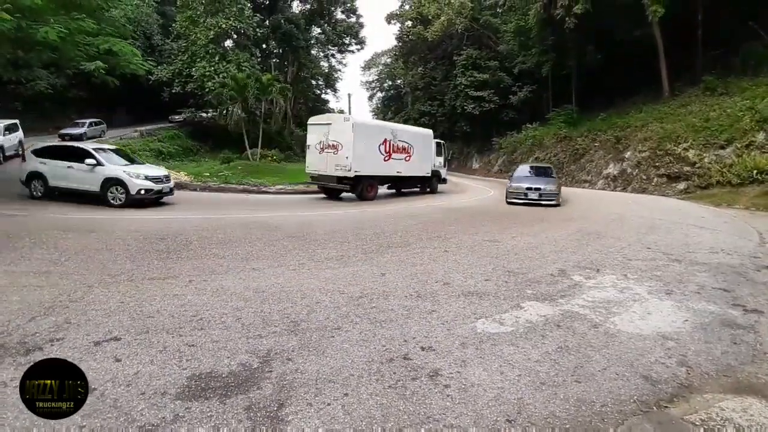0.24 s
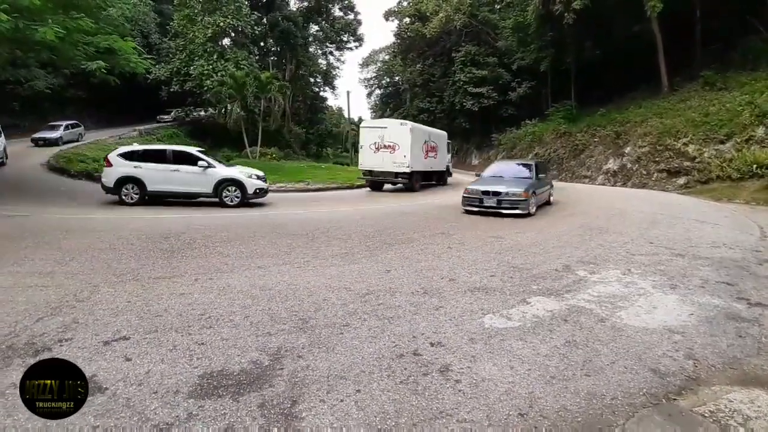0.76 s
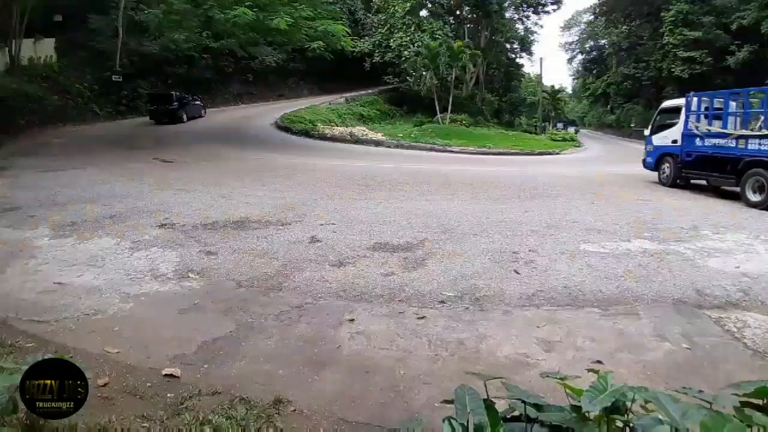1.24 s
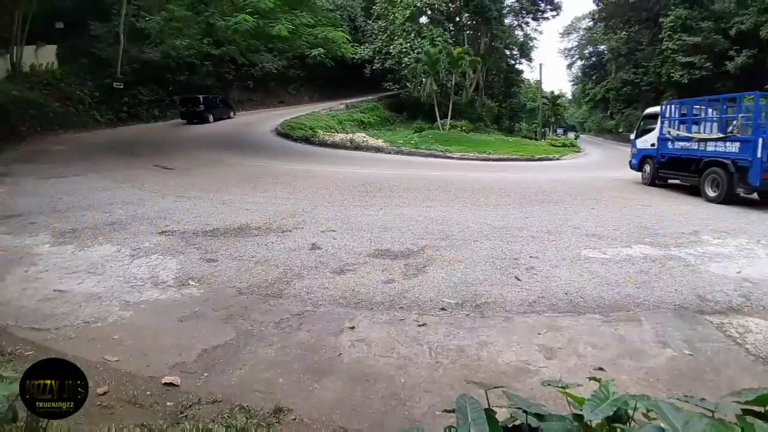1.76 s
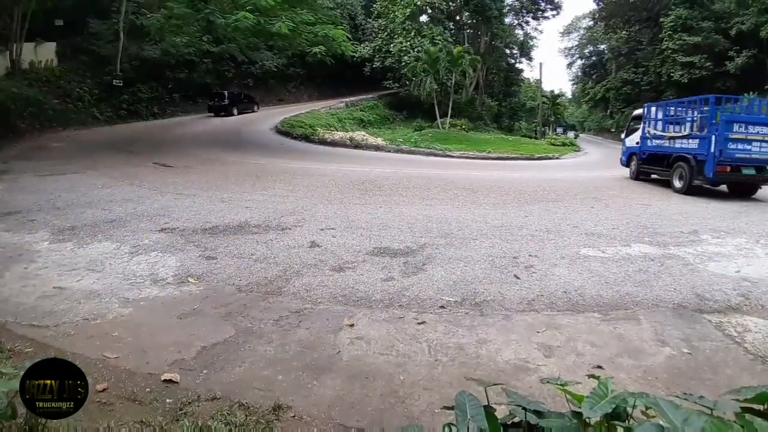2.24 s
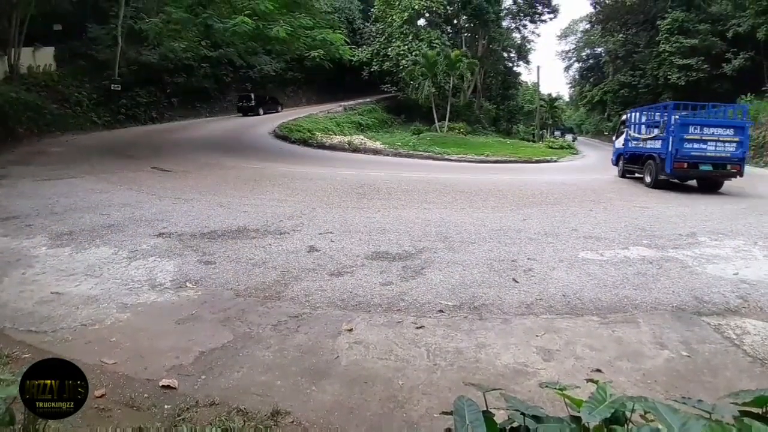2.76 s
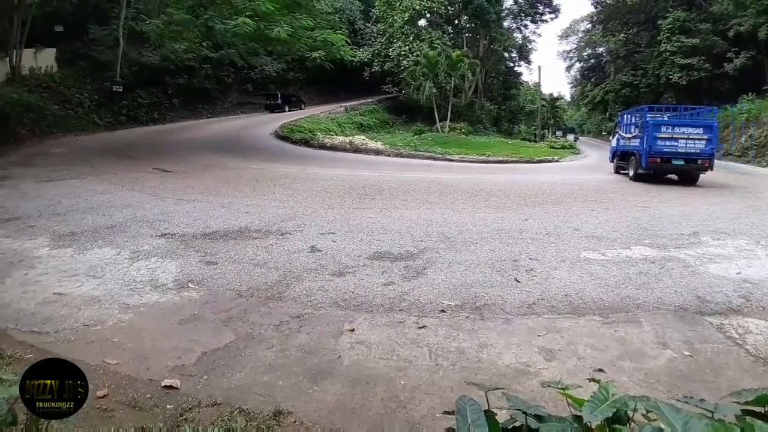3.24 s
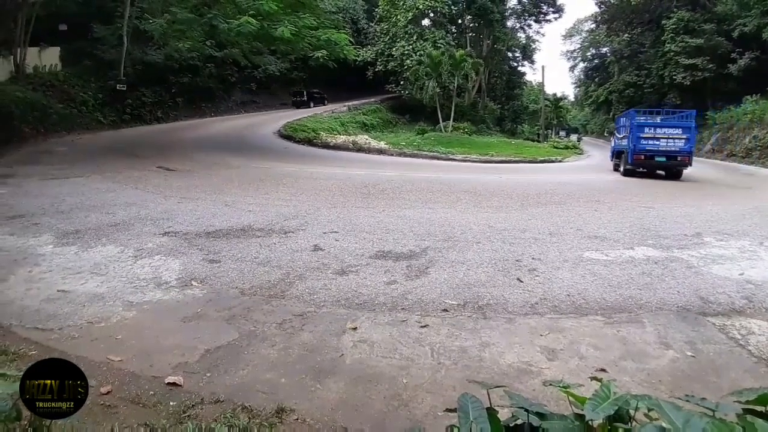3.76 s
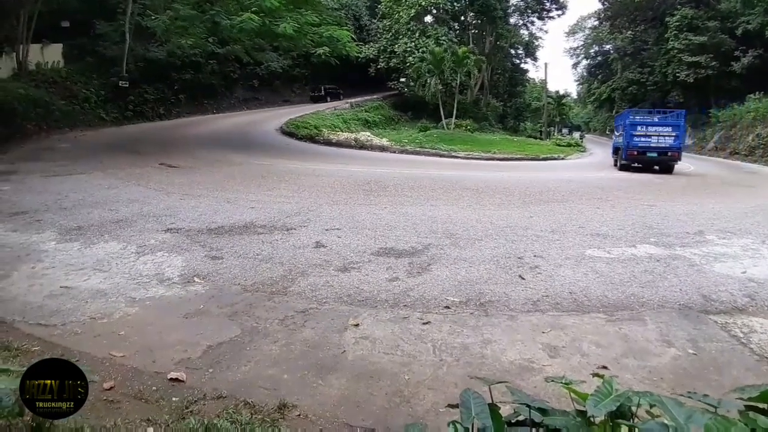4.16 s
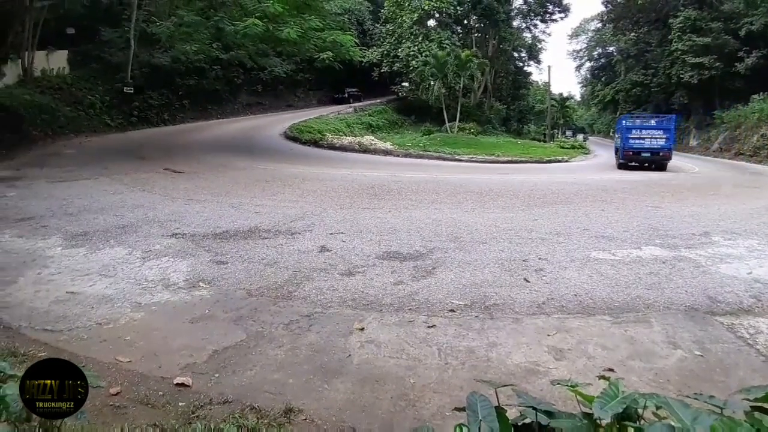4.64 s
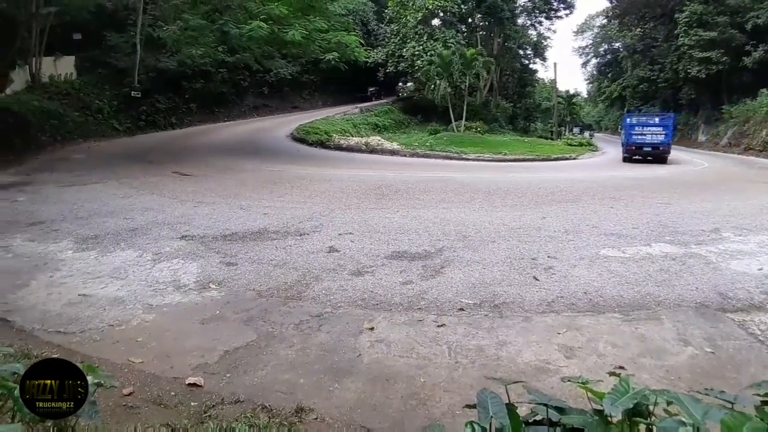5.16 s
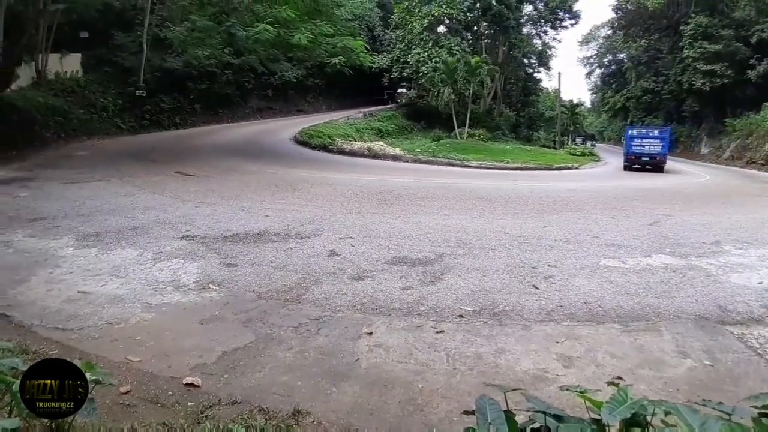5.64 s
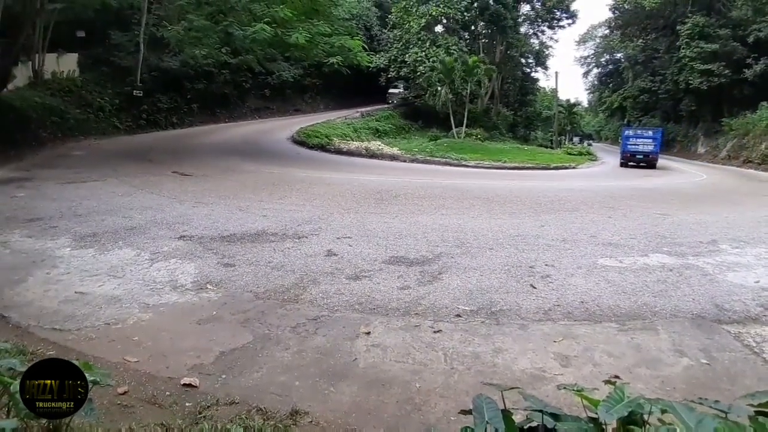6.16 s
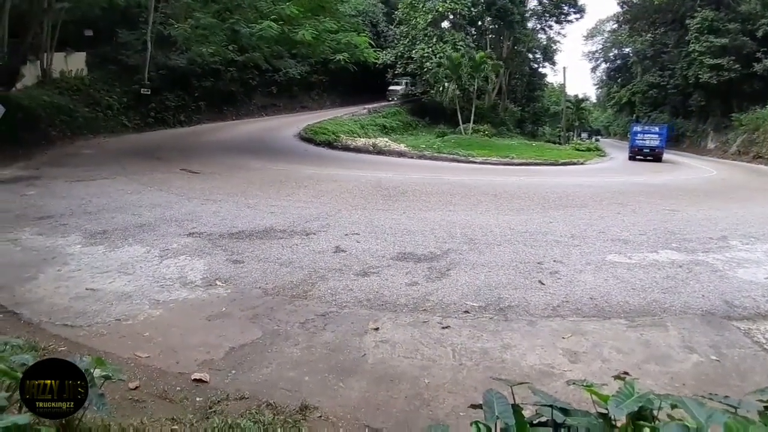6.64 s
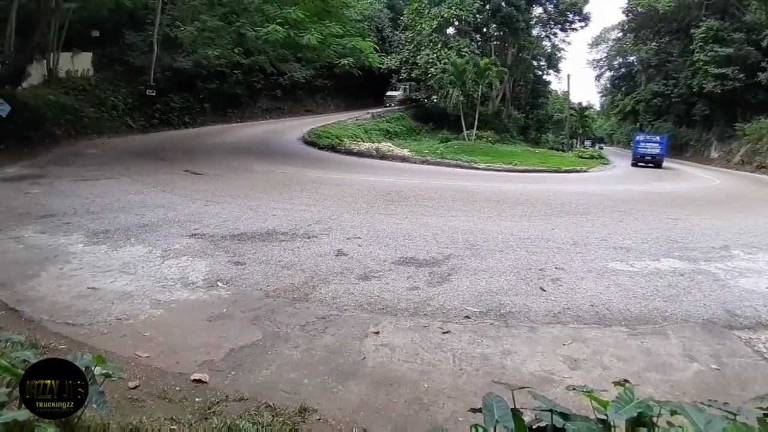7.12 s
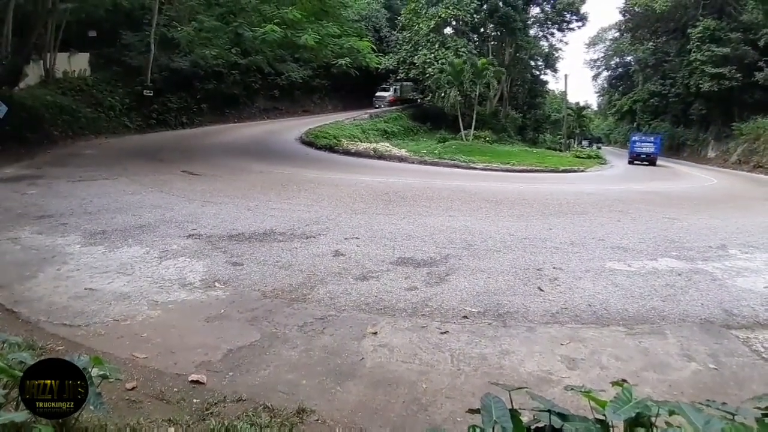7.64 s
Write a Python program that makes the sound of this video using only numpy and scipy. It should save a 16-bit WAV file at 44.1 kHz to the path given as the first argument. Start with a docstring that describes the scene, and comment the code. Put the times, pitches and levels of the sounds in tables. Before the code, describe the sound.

On a wooded hairpin bend, a box truck's engine and tyre noise fade to silence. Abruptly two trucks are close: a heavy diesel growls as it slowly loses revs, while a lighter truck revs and booms off the throttle. Brakes squeak faintly and loose metal rattles over tyre hiss. A horn gives two loud, short toots that echo off the hillside, and the engines carry on farther away.

```python
"""A box truck's engine and road noise, on a steep hairpin bend among trees, are faded out to silence.
The scene changes abruptly: a heavy diesel truck holds back on its engine, slowly losing revs, while a
light truck revs, booms on the overrun and changes gear. Their periodic firing makes exhaust tones,
rumble and clatter over the hiss of tyres on asphalt. Brakes squeak faintly, loose metal rattles, and
the two buzzing diaphragms of a horn toot twice, echoed by the hillside."""
import sys
import numpy as np
from scipy import signal
from scipy.fft import rfft, irfft, next_fast_len
from scipy.io import wavfile

SR = 44100
rng = np.random.default_rng(int(sys.argv[2]) if len(sys.argv) > 2 else 0)


def master_out(mix):
    """Clip the mix to full scale and print it as 16-bit PCM to the path in sys.argv[1]."""
    frames = np.transpose(np.atleast_2d(mix))
    ceiling = np.clip(frames, -1, 1)
    pcm = np.round(ceiling * 32767).astype(np.int16)
    wavfile.write(sys.argv[1], SR, pcm)


N = 347949
TIME = np.arange(N) / SR
FFT_SIZE = next_fast_len(N + SR)
FREQ_HZ = np.maximum(np.arange(FFT_SIZE // 2 + 1) * SR / FFT_SIZE, 1)

SCENE_CHANGE_S = 1.234
TURN_S, TURN_LENGTH_S = 4.86, 0.83   # the two trucks turn away, from near to far
PIPE_HZ, PIPE_WIDTH_HZ, PIPE_DB = 108, 12.5, 5.5   # resonance of the light truck's exhaust pipe

# the light truck's overrun, throttle shut: start_s, end_s, gain_db
OVERRUN = (2.62, 3.37, 10.5)
# relative beat of each cylinder of a four-cylinder engine: level_db
FOUR_CYLINDERS_DB = [-3.5, -7, -3, -9]


def from_db(db):
    """Amplitude ratio of a level in decibels."""
    return 10 ** (np.asarray(db) / 20)


def unit_rms(x):
    """Normalisation to unit power."""
    return x / np.sqrt(np.mean(x ** 2) + 1e-20)


def spectral_curve(points):
    """Interpolation of (frequency_hz, value) points along a logarithmic frequency axis."""
    hz, value = np.transpose(points)
    return np.interp(np.log(FREQ_HZ), np.log(hz), value)


def filtered(x, response):
    """Linear filtering: the spectrum is multiplied by a frequency response."""
    return irfft(rfft(x, FFT_SIZE) * response, FFT_SIZE)[..., :N]


def coloured(x, spectrum):
    """Spectral shaping to unit power, with steep skirts beyond the ends of the spectrum."""
    skirts = (1 + (spectrum[0][0] / FREQ_HZ) ** 12 + (FREQ_HZ / spectrum[-1][0]) ** 12) ** -.5
    return unit_rms(filtered(x, from_db(spectral_curve(spectrum)) * skirts))


def drift(rate_hz, size=N):
    """Random modulation: low-passed noise of unit power."""
    step = 40   # samples between random values
    pole = np.exp(-2 * np.pi * step * rate_hz / SR)
    slow = signal.lfilter([1], [1, -2 * pole, pole * pole], rng.standard_normal(N // step + 2002))[2000:]
    return np.interp(np.arange(size) / step, np.arange(len(slow)), unit_rms(slow))


def cycles(hz):
    """Phase in cycles is the time integral of frequency."""
    return np.cumsum(hz) / SR


def placed(x, lead_ms, left_db):
    """Interaural time and level differences: the left ear leads by lead_ms and differs by left_db."""
    left, right = np.broadcast_to(x, (2, N))
    gain = from_db(left_db / 2)
    return np.array([left * gain, np.interp(TIME - lead_ms / 1000, TIME, right) / gain])


def stereo_noise():
    """A diffuse field: white noise, coherent between the ears only at long wavelengths."""
    # interaural coherence: frequency_hz, correlation
    coherence = [(50, 0.98), (250, 0.99), (500, 0.87), (1000, 0.1), (2000, 0.091), (4000, 0.23),
                 (8000, 0.057), (15000, 0.089)]
    alike = np.clip(spectral_curve(coherence), 0, 1)
    mid, side = filtered(rng.standard_normal((2, N)), np.sqrt([1 + alike, 1 - alike]))
    return unit_rms(np.array([mid + side, mid - side]))


def hillside(x, t60_s, dull_hz):
    """Scattering from the bank and trees gives each ear its own exponentially decaying echoes."""
    t = TIME[:SR]
    tail = rng.standard_normal((2, SR)) * from_db(-60 * t / t60_s) * (1 - np.exp(-t / 0.027))
    tail /= np.sqrt(np.sum(tail ** 2) / 2)
    tail = signal.sosfilt(signal.butter(1, dull_hz, fs=SR, output="sos"), tail)
    return signal.fftconvolve(x[None], tail, axes=1)[:, :N]


def brakes():
    """Friction-excited vibration: the linings give short squeaks of unsteady pitch."""
    # squeaks: peak_s, pitch_hz, half_width_s, level_db
    squeaks = [(0.968, 9300, 0.045, -70), (1.89, 9160, .04, -59), (2.84, 8750, .03, -61),
               (2.967, 8780, 0.029, -55), (2.95, 11200, .02, -55), (4.45, 8816, .04, -61)]
    sound = np.zeros(N)
    for peak_s, pitch_hz, half_width_s, db in squeaks:
        swell = from_db(db) * np.exp(-((TIME - peak_s) / half_width_s) ** 2)
        sound += swell * np.sin(2 * np.pi * cycles(pitch_hz * (1 + .014 * drift(200))))
    return placed(sound, lead_ms=0.314, left_db=8.0)


def rattles():
    """Impact noise: loose metal on the light truck chatters over bumps in broadband bursts."""
    # bumps: peak_s, half_width_s, level_db
    bumps = [(2.963, 0.029, -45), (4.43, 0.072, -50.5)]
    # spectrum of the metal: frequency_hz, gain_db
    metal = [(1300, 0), (3500, -2), (9000, -6), (14000, -10)]
    swell = sum(from_db(db) * np.exp(-((TIME - peak_s) / width) ** 2) for peak_s, width, db in bumps)
    return swell * coloured(stereo_noise() * from_db(3 * drift(80)), metal)


def drone(firing_hz, orders, waver_db, rough_db):
    """Engine orders (multiple, level_db) are tones locked to the firing; uneven firing roughens them."""
    phase = 2 * np.pi * cycles(firing_hz)
    tones = 0
    for multiple, db in orders:
        amplitude = np.sqrt(2) * from_db(db + waver_db * drift(9.0))
        tones += amplitude * np.sin(multiple * phase + rng.uniform(0, 2 * np.pi))
    return tones * from_db(rough_db * drift(30))


def exhaust_beats(firing_hz, cylinders_db, rough_db):
    """An impulse train, one puff per firing, varying from cylinder to cylinder and at random."""
    firings = np.flatnonzero(np.diff(np.floor(cycles(firing_hz))))
    scatter_db = rough_db * rng.standard_normal(N)[:len(firings)]
    beats = np.zeros(N)
    beats[firings] = from_db(np.resize(cylinders_db, len(firings)) + scatter_db)
    return unit_rms(beats)


def knock(firing_hz, decay_cycles):
    """The envelope of combustion noise: it flares at each firing and decays exponentially."""
    return unit_rms(np.exp(-(cycles(firing_hz) % 1) / decay_cycles) * from_db(2.9 * drift(36)))


def traffic(spectra, levels_db, beats, knocks, beat_db, shake_db, knock_share, lead_ms, left_db):
    """Source and filter: noise and firing pulses are shaped into rumble, clatter and tyre hiss."""
    rumble_db, clatter_db, hiss_db = levels_db
    air = stereo_noise()
    pulsing = air * (1 - knock_share + knock_share * knocks)
    # firings shake block and body, smeared by nearby echoes
    shake = unit_rms(hillside(beats, t60_s=0.038, dull_hz=1500))[0]
    rumble = from_db(rumble_db) * coloured(air + from_db(beat_db) * beats, spectra[0])
    clatter = from_db(clatter_db) * coloured(pulsing + from_db(shake_db) * shake, spectra[1])
    hiss = from_db(hiss_db) * coloured(pulsing, spectra[2])
    return placed(rumble, 0.38 * lead_ms, 0.5 * left_db) + placed(clatter + hiss, lead_ms, left_db)


def box_truck():
    """Periodic firing: engine orders and road noise, revs creeping up, are faded out to silence."""
    # spectra of exhaust, engine and tyres: frequency_hz, gain_db
    rumble = [(21, -42), (35, -31), (64, -20), (85, -5), (123, -10.5), (226, -5), (258, -11), (339, -10.5),
              (600, -21), (780, -42), (1320, -120)]
    clatter = [(260, -41), (450, -27), (502, -30), (737, -2), (970, -4), (1110, -2), (1350, -3.5),
               (2680, -17.5), (3360, -30), (4000, -27), (5200, -58), (8800, -120)]
    hiss = [(1880, -11), (3200, -4.5), (3490, -7.5), (4450, -11), (4820, -9), (6060, -12.5), (10700, -14.5),
            (16000, -19)]
    # rumble, clatter and hiss before the fade: start_db, slope_db_per_s
    trends = [(-32, -2.5), (-41.5, 1.5), (-50, -2)]
    # exhaust tones before the fade: firing_multiple, level_db
    orders = [(1, -41), (2, -38), (3, -46), (4, -42.5)]
    firing_hz = 56.56 + 2.5 * TIME
    levels_db = [db + slope * TIME for db, slope in trends]
    tones = drone(firing_hz, orders, waver_db=2.4, rough_db=1.8)
    beats = exhaust_beats(firing_hz, FOUR_CYLINDERS_DB, rough_db=5.0)
    road = traffic((rumble, clatter, hiss), levels_db, beats, knock(firing_hz, decay_cycles=.4),
                   beat_db=-7, shake_db=-27, knock_share=0.19, lead_ms=.6, left_db=6.4)
    silent_s = 1.196
    return (tones + road) * np.clip(1 - TIME / silent_s, 0, 1) ** 1.03


def heavy_exhaust(firing_hz, away):
    """Six unequal cylinders add lines between the firing harmonics, which beat together as a growl."""
    # harmonics of the six-firing cycle: cycle_multiple, start_db, near_slope_db_per_s, far_db
    lines = [(6, -37.5, .3, -51), (14, -39.5, -3.5, -52), (18, -39, -4, -44.5), (20, -45, 1, -64),
             (21, -42, 2.6, -56.5), (22, -43, 1.4, -55), (24, -36, -7, -48), (27, -46, -0.5, -59)]
    near_s = np.clip(TIME, SCENE_CHANGE_S, TURN_S) - SCENE_CHANGE_S
    orders = [(k / 6, (1 - away) * (db + slope * near_s) + away * far_db)
              for k, db, slope, far_db in lines]
    return drone(firing_hz, orders, waver_db=1.5, rough_db=.5)


def pedal(start_s, end_s, gain_db):
    """A trapezoidal level change: the pedal moves, holds and returns."""
    travel_s = .14
    return gain_db * np.clip(np.minimum(TIME - start_s, end_s - TIME) / travel_s + .5, 0, 1)


def light_exhaust(firing_hz, away):
    """Pipe resonance lifts the firing tone; it also booms on the overrun and drops with the clutch."""
    # gear change, clutch out: start_s, end_s, gain_db
    gear_change = (5.2, 5.52, -27)
    # overtones relative to the firing tone: firing_multiple, near_db, far_db
    overtones = [(2, -12, -3), (3, -16.5, -2)]
    boom_db = PIPE_DB * np.exp(-((firing_hz - PIPE_HZ) / PIPE_WIDTH_HZ) ** 2 / 2)
    pull_db = 1.5 * np.maximum(TIME - gear_change[1], 0)   # it pulls ever harder in the new gear
    tone_db = (1 - away) * (-45 + boom_db) + away * (-44.5 + pull_db)
    tone_db += pedal(*OVERRUN) + pedal(*gear_change)
    orders = [(k, tone_db + (1 - away) * near_db + away * far_db) for k, near_db, far_db in overtones]
    return drone(firing_hz, [(1, tone_db)] + orders, waver_db=2.0, rough_db=1.0)


def overrun_rasp(firing_hz):
    """Pulsed flow noise: with the throttle shut, each firing spits a burst through the pipe."""
    # pass band of the pipe: frequency_hz, gain_db
    band = [(1250, -6), (1380, 0), (1520, -8)]
    throttle_shut = pedal(*OVERRUN) / OVERRUN[2]
    level_db = -47.5 + 14 * np.log2(firing_hz / PIPE_HZ)   # louder at higher revs
    bursts = rng.standard_normal(N) * knock(firing_hz, decay_cycles=0.37)
    return throttle_shut * from_db(level_db) * coloured(bursts, band)


def two_trucks():
    """Superposition of two engines; their noise passes from near to far in a sine-cosine crossfade."""
    # revs of each truck: time_s, firing_hz
    heavy_revs = [(1.27, 65.06), (2.6, 61.51), (4.45, 57.55), (5.0, 56.38), (5.6, 53.76), (6.8, 51.67),
                  (7.89, 48.86)]
    light_revs = [(1.27, 87.5), (1.5, 96.6), (2.05, 105), (2.55, 127.4), (2.95, 113.2), (3.45, 87.5),
                  (4.0, 81.1), (4.25, 106.9), (4.8, 110.7), (5.08, 121), (5.5, 62), (6.7, 72.12),
                  (7.89, 81.5)]
    # relative beat of each of the heavy truck's cylinders: level_db
    six_cylinders_db = [-4.5, -10.5, -4, -8.5, -4, -9.5]
    # the heavy truck's gear tones, relative to the near clatter: firing_multiple, level_db
    gears = [(8, -17), (12, -15.5), (13, -13.5), (14, -23)]
    # spectra of exhausts, engines and tyres, near and far: frequency_hz, gain_db
    rumble_near = [(30, -23), (42, -8), (52, -4), (70, 2), (100, -2.5), (150, 3.5), (175, -5.5),
                   (220, -4.5), (280, 6), (330, -6), (450, -11.5), (650, -10.5)]
    clatter_near = [(260, -17), (450, -5), (484, -3), (566, -11), (731, 1.5), (869, 4.5), (927, 4),
                    (1110, -8), (1310, -1.5), (1490, -2.5), (1760, -7.5), (2030, -3.5), (2560, -8),
                    (3100, -16.5), (4000, -17.5), (5200, -28), (8800, -120)]
    hiss_near = [(1880, -14), (3200, -5.5), (4890, -8.5), (5860, -3), (7880, -10.5), (9020, -10),
                 (10200, -14), (13100, -13.5), (15100, -16), (16000, -21)]
    rumble_far = [(30, -26), (42, -8), (52, 7), (75, 1.5), (105, -2), (150, -2.5), (180, -1), (225, -1),
                  (290, 2.5), (350, -3.5), (450, -6), (650, -13)]
    clatter_far = [(260, -42), (450, -16.5), (516, -43), (560, -42), (597, -27), (717, 1), (815, -2.5),
                   (927, 2), (1150, -3), (1290, -10.5), (1400, -6), (1890, -10), (2090, -5), (2990, -15),
                   (4000, -16), (5200, -23.5), (8800, -120)]
    hiss_far = [(1880, -18), (3200, -17.5), (3490, -31.5), (3860, -26), (4890, -8), (5750, 6), (6840, 4),
                (7880, -2), (15100, -8), (16000, -28)]
    # near rumble, clatter and hiss: base_db, slope_db_per_s, light_revs_db_per_octave
    near_trends = [(-29, -1.28, 2.5), (-34, -0.62, 2), (-46.5, -1, 3)]
    # far rumble, clatter and hiss: level_db
    far_levels = [-36.5, -40.5, -54.5]
    heavy_hz = np.interp(TIME, *np.transpose(heavy_revs))
    light_hz = np.interp(TIME, *np.transpose(light_revs))
    away = np.clip((TIME - TURN_S) / TURN_LENGTH_S, 0, 1)
    near_db = [db + slope * (TIME - SCENE_CHANGE_S) + per_octave * np.log2(light_hz / PIPE_HZ)
               for db, slope, per_octave in near_trends]
    far_db = [db + 9.5 * np.maximum(TIME - 7.43, 0) for db in far_levels]   # more traffic draws near
    exhausts = heavy_exhaust(heavy_hz, away) + light_exhaust(light_hz, away)
    whine = drone(heavy_hz, [(k, near_db[1] + db) for k, db in gears], waver_db=0.0, rough_db=2.5)
    beats = exhaust_beats(heavy_hz, six_cylinders_db, rough_db=2.0)
    beats += 0.68 * exhaust_beats(light_hz, FOUR_CYLINDERS_DB, rough_db=2.0)
    knocks = (knock(heavy_hz, decay_cycles=1.0) + knock(light_hz, decay_cycles=1.0)) / 2
    near = traffic((rumble_near, clatter_near, hiss_near), near_db, beats, knocks,
                   beat_db=-3.0, shake_db=-26.5, knock_share=0.33, lead_ms=0.388, left_db=-2.5)
    near += placed(whine, lead_ms=0.19, left_db=-1.0)
    far = traffic((rumble_far, clatter_far, hiss_far), far_db, beats, knocks,
                  beat_db=-6.5, shake_db=-26.0, knock_share=0.17, lead_ms=0.3832, left_db=-3.0)
    road = np.cos(np.pi / 2 * away) * near + np.sin(np.pi / 2 * away) * far
    rasp = placed(overrun_rasp(light_hz), lead_ms=0.4, left_db=-4.0)
    return placed(exhausts, lead_ms=0.23, left_db=-1.1) + rasp + road


def diaphragm(harmonics, pitch_hz, dispersion_rad, buzz_db, top_db, count):
    """Self-sustained oscillation: a horn starts sharp, settles and rings on briefly after each press."""
    # presses of the button: start_s, end_s, level_db, tilt_db_per_octave
    toots = [(5.053, 5.136, -13, 0.43), (5.202, 5.279, -15, 1.06)]
    # spectrum of the contact's rasp: frequency_hz, gain_db
    contact = [(700, -3), (1200, 3), (2300, -3), (3300, -5), (4600, -16), (6500, -14), (7500, -11),
               (8300, -13), (12000, -10.5), (15000, -13)]
    sounding = (TIME > toots[0][0]) & (TIME < toots[-1][1] + .25)
    t = TIME[sounding]
    swings, sharp = [], 0
    for start_s, end_s, _, _ in toots:
        held_s, released_s = np.maximum(t - start_s, 0), np.maximum(t - end_s, 0)
        attack, release = 1 - np.exp(-held_s / 0.0094), np.exp(-released_s / 0.037)
        swings.append(attack * release * from_db(-18 * held_s))   # the swing sags while held
        sharp += 0.014 * np.exp(-held_s / 0.0176) * (t > start_s)
    strokes = cycles(pitch_hz * (1 + sharp + 0.0032 * drift(90, len(t))))
    # above the horn's resonances the contact leaves a low, even comb of harmonics
    partials_db = [db for _, db in harmonics] + [top_db] * (count - len(harmonics))
    total_rms = np.sqrt(np.sum(from_db(partials_db) ** 2) / 2)
    tone, rasp = np.zeros((2, 2, N))
    for k, db in enumerate(partials_db, 1):
        octaves = np.log2(k)
        # upper partials need a wide swing: they arrive later and die sooner
        swell = sum(swing ** (1 + 0.058 * octaves) * from_db(level_db + tilt * octaves)
                    for swing, (_, _, level_db, tilt) in zip(swings, toots))
        # shifting paths over the road make the upper partials come and go, differently in each ear
        depth = min(k / 11, 1)
        scatter = np.array([drift(8.9, len(t)) + 1j * drift(14.0, len(t)) for ear in range(2)])
        paths = (1 + depth * scatter) / np.sqrt(1 + 2 * depth ** 2)
        # the flare delays the high harmonics, which smears every stroke
        phase = 2 * np.pi * k * strokes - dispersion_rad * k * k
        tone[:, sounding] -= from_db(db) / total_rms * swell * np.real(paths * np.exp(1j * phase))
    bursts = np.exp(-4 * (strokes % 1))   # one at each stroke
    rasp[:, sounding] = sum(swings) * rng.standard_normal((2, len(t))) * bursts
    return tone + from_db(buzz_db) * tone.std() * coloured(rasp, contact)


def horn():
    """Direct sound and reflections: two close horns about a fourth apart, answered by the hillside."""
    # relative spectrum of each diaphragm: harmonic, level_db
    high_partials = [(1, 1), (2, 4.5), (3, 4), (4, -7), (5, -4.5), (6, -23), (7, -11.5), (8, -5), (9, -8),
                     (10, -11), (11, -25), (12, -17.5), (13, -27), (14, -20), (15, -16), (16, -20),
                     (17, -35), (18, -32), (19, -19), (20, -13.5), (21, -21), (22, -41), (23, -11.5),
                     (24, -23), (25, -18), (26, -26), (27, -19), (28, -13), (29, -18), (30, -46)]
    low_partials = [(1, -34), (2, -7.5), (3, -6.5), (4, -3), (5, -8.5), (6, -19), (7, -9), (8, -9.5),
                    (9, -13.5), (10, -18), (11, -5.5), (12, -15), (13, -14.5), (14, -23), (15, -16),
                    (16, -30), (17, -39), (18, -23), (19, -13.5), (20, -24.5)]
    high = diaphragm(high_partials, pitch_hz=262.1, dispersion_rad=.1, buzz_db=-19, top_db=-28.5,
                     count=54)
    low = diaphragm(low_partials, pitch_hz=193.1, dispersion_rad=0.0882, buzz_db=-9.5, top_db=-25,
                    count=40)
    pair = high + from_db(-8.5) * low
    mono = pair.mean(0)
    echoes = from_db(-8.5) * hillside(mono, t60_s=0.8, dull_hz=9650)
    echoes += from_db(-19.5) * hillside(mono, t60_s=1.6, dull_hz=5070)
    across_bend = np.interp(TIME - .42, TIME, mono)   # a late answer from the far slope
    echoes += from_db(-28.5) * hillside(across_bend, t60_s=0.27, dull_hz=2990)
    return placed(pair, lead_ms=0.013, left_db=-3.5) + echoes


def scene():
    """The box truck gives way abruptly to the two trucks; the other sources add by superposition."""
    return np.where(TIME < SCENE_CHANGE_S, box_truck(), two_trucks()) + horn() + brakes() + rattles()


def record(dry):
    """Band limiting: a steep low-pass removes the top treble after clipping at full scale."""
    low_pass = signal.ellip(10, .1, 90, 15750, fs=SR, output="sos")
    return signal.sosfilt(low_pass, np.clip(dry, -1, 1))


dry = scene()
out = record(dry)
master_out(out)
```